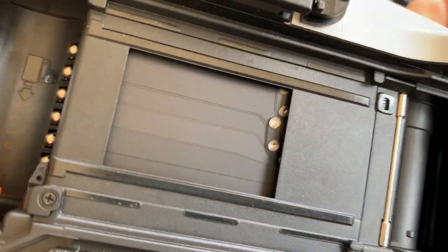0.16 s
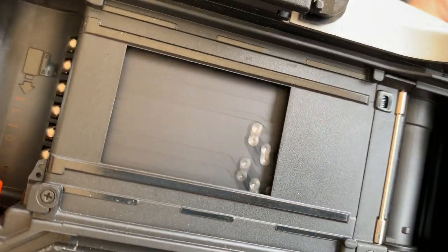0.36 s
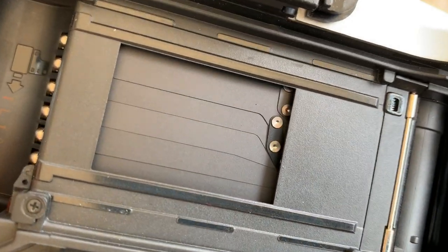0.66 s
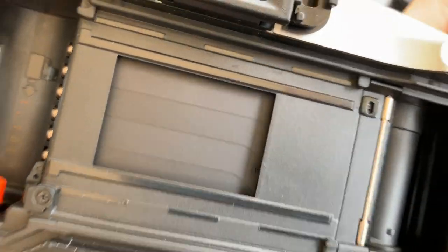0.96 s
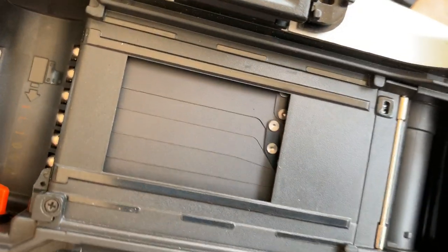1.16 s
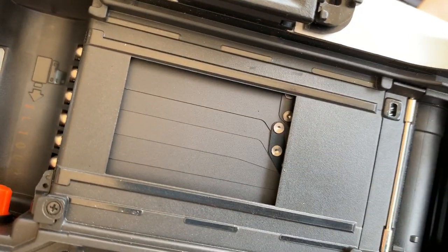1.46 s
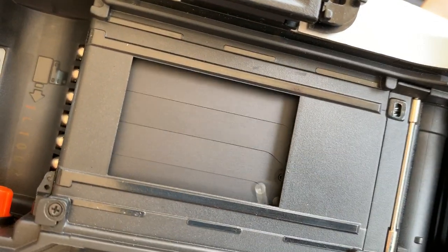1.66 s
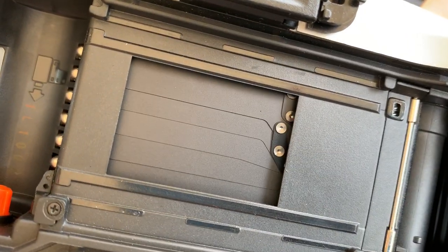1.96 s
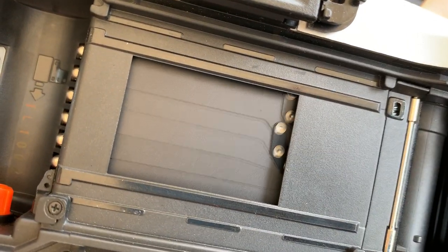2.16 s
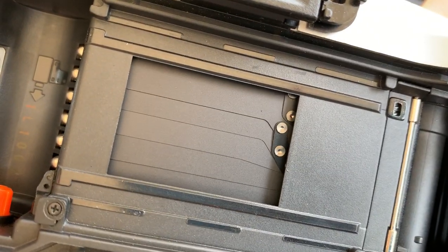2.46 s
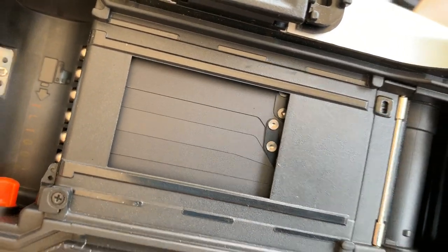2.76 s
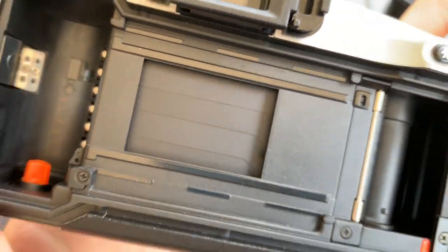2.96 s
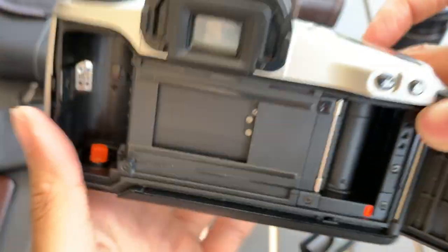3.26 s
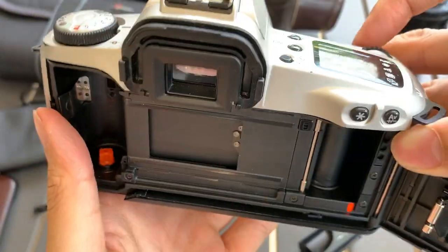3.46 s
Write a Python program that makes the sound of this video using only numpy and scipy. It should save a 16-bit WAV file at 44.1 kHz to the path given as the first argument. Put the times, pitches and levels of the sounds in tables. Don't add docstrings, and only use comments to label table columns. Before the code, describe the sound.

A film camera close to the microphone fires five evenly spaced shots in a quiet room: a crisp double clack, then a short high motor whine ending in small clicks; afterwards a light finger tick and faint creaks.

```python
import sys
import numpy as np
from scipy import signal
from scipy.fft import rfft, irfft, next_fast_len
from scipy.io import wavfile
from scipy.ndimage import uniform_filter1d, map_coordinates

SR = 44100
rng = np.random.default_rng(int(sys.argv[2]) if len(sys.argv) > 2 else 0)


def unload_audio(sound):
    columns = np.transpose(np.atleast_2d(sound))
    steps = np.round(np.clip(columns, -1, 1) * 32767)
    wavfile.write(sys.argv[1], SR, steps.astype(np.int16))


def gain_from_db(level_db):
    decades = np.asarray(level_db, float) / 20
    return 10 ** decades


N = 158760
T = np.arange(N) / SR


def unit(x):
    return x / np.sqrt(np.mean(x ** 2) + 1e-20)


def along(points, hz):
    f, v = np.transpose(points)
    return np.interp(np.log(hz + 1), np.log(f + 1), v)


def wobble(rate):
    coarse = T[::16]
    knots = rng.standard_normal(size=4000)
    return np.interp(T, coarse, map_coordinates(knots, [coarse * rate]))


def filtered(x, response):
    m = next_fast_len(N + 4096, real=True)
    return irfft(rfft(x, m) * response(np.fft.rfftfreq(m, 1 / SR)), m)[:N]


def body(peaks, narrow=.7):
    def response(f):
        total = 0
        for k, (centre, width, db) in enumerate(peaks):
            loss = 1j * f * narrow * width
            total = total + (-1) ** k * gain_from_db(db) * loss / (centre * centre - f * f + loss)
        return total
    return response


def noise(spectrum):
    return unit(filtered(rng.standard_normal(N), lambda hz: gain_from_db(along(spectrum, hz))))


def resonant_noise(centre, width):
    return unit(filtered(rng.standard_normal(N), body([(centre, width, 0)])))


def even_grit(shape, count):
    x = shape * rng.standard_normal((count, len(shape)))
    for _ in range(3):
        z = rfft(x)
        x = irfft(z / (np.abs(z) + 1e-12), len(shape))
        local_power = np.abs(uniform_filter1d(x ** 2, size=24))
        x = x * shape / np.sqrt(local_power + 1e-20)
    return x


def blows(events, back, blow, peaks):
    rise, t60, level_db, crack_db, rattle_db, rattle_t60 = blow
    force, t = np.zeros(N + SR), T[:8192]
    onset = 1 - np.exp(-(t / rise) ** 2)
    hits = [(s + delay, db + less_db) for delay, less_db in [(0, 0)] + back for s, db in events]
    crunch = even_grit((onset * gain_from_db(-60 * t / t60))[:1024], count=len(hits))
    for (s, db), row in zip(hits, crunch):
        force[round(s * SR):][:len(row)] += gain_from_db(db) * row
    for s, db in events:
        rattle = onset * gain_from_db(db + rattle_db - 60 * t / rattle_t60)
        force[round(s * SR):][:len(t)] += rattle * rng.standard_normal(len(t))
    force = force[:N]
    ring = body(peaks, narrow=.9)

    def crack(f):
        return gain_from_db(crack_db) * (1j * f / (1200 + 1j * f)) ** 2 / (1 + 1j * f / 9000)

    scale = np.sqrt(np.mean(np.abs(ring(np.linspace(1, SR / 2, num=2000))) ** 2))
    scattered = force * np.sign(rng.standard_normal(N))
    return gain_from_db(level_db) * (filtered(force, ring) + filtered(scattered, crack)) / scale


def shot_clock():
    starts = np.transpose(MIRROR)[0]
    which = np.clip(np.searchsorted(starts - .1, T) - 1, 0, None)
    return which, T - starts[which]


def each_shot(rows):
    s, db = np.transpose(rows)
    return gain_from_db(np.interp(shot_clock()[1], s, db, -150, -150))


CLICK_RUN_DB = [-2, -1, 0, 2, 2]


def after_mirror(rows):
    return [(s + delay, db + run_db + rng.normal(0, 1.2))
            for (s, _), run_db in zip(MIRROR, CLICK_RUN_DB) for delay, db in rows]


# pitch_hz, level_db (per Hz)
AIR = [(100, -30), (135, -2), (250, 0), (500, -5), (1000, -9), (2500, -17), (8000, -30), (16500, -37)]
# pitch_hz, level_db (per Hz)
RUMBLE = [(8.8, -33), (15, -3), (22, -4), (38, 0), (54, 0), (102, -4), (124, -10), (135, -10), (180, -40),
          (300, -120)]
# pitch_hz, width_hz, level_db
HUM = [(227, 10, -70), (97, 6, -66), (48, 8, -64), (378, 14, -74)]


def room_tone():
    hum = sum(gain_from_db(db) * resonant_noise(centre, width) for centre, width, db in HUM)
    air = gain_from_db(-59.6 + .8 * wobble(3)) * noise(AIR)
    rumble = gain_from_db(-58.5 + 1.2 * wobble(4)) * noise(RUMBLE)
    return air + rumble + hum


# after_mirror_s, level_db
RELEASE = [(-.04, -75), (-.025, -60), (-.012, -52), (-.003, -55), (.005, -80)]
# after_mirror_s, level_db
LOAD = [(-.045, -75), (-.039, -53), (0, -48), (.08, -46), (.13, -50), (.17, -46), (.3, -44), (.33, -48),
        (.37, -63), (.42, -85)]
# after_mirror_s, level_db
GRIT = [(-.046, -40), (-.02, -18), (0, -6), (.05, 0), (.31, -1.5), (.335, -8), (.42, -10)]
# pitch_hz, level_db (per Hz)
GEARS = [(240, -43), (500, -16), (1410, -8), (2290, -3), (3430, -7), (5600, -13), (11500, -18),
         (15300, -30)]
# pitch_hz, width_hz, level_db
HOUSING = (2250, 600, 1.5)
# after_mirror_s, level_db
WHINE = [(.09, -75), (.13, -55), (.143, -51), (.151, -42), (.27, -40), (.31, -43), (.325, -58), (.35, -75)]
# after_mirror_s, level_db
OVERTONES = [(.085, -80), (.11, -65), (.14, -60), (.155, -51), (.18, -53), (.26, -56), (.305, -55),
             (.325, -80)]
ORDERS_DB = [0, -3, -13, -22]
RUN_HZ = [0, -10, 0, 10, 30]
# after_mirror_s, pitch_hz
SAG = [(.2, 0), (.235, 0), (.265, -60), (.305, 0), (.33, -120), (.36, -200)]
RELEASE_S, RELEASE_SPIN_S = -.046, .038
START_S, SPIN_S = .085, .023
FULL_HZ, CREEP_HZ_PER_S, JITTER_HZ = 2445, 120, 28
TEETH, BEAT, FLUTTER_DB = 24, .3, 1.6


def motor():
    which, t = shot_clock()
    releasing = t < .02
    run = np.clip(np.where(releasing, t - RELEASE_S, t - START_S), 0, None)
    spin_up = 1 - np.exp(-run / np.where(releasing, RELEASE_SPIN_S, SPIN_S))
    sag = np.interp(t, *np.transpose(SAG))
    steady_hz = FULL_HZ + np.array(RUN_HZ)[which] + CREEP_HZ_PER_S * run + sag
    hz = steady_hz * spin_up + JITTER_HZ * wobble(400)
    phase = 2 * np.pi * np.cumsum(hz) / SR
    once = np.cos(phase / TEETH + 1.2 * wobble(20))
    twice = np.cos(2 * phase / TEETH + 2 * wobble(30))
    turn = 1 + BEAT * (once + .6 * twice)

    mesh = each_shot(WHINE) * gain_from_db(FLUTTER_DB * wobble(110)) * np.sin(phase)
    over = sum(gain_from_db(db + 1.5 * FLUTTER_DB * wobble(110)) * np.sin((k + 2) * phase)
               for k, db in enumerate(ORDERS_DB))
    whine = mesh + (each_shot(OVERTONES) + each_shot(RELEASE)) * over

    centre, width, db = HOUSING
    boom = gain_from_db(db) * resonant_noise(centre, width)
    grit = each_shot(GRIT) * gain_from_db(1.9 * wobble(500)) * noise(GEARS)
    gears = (grit + boom) / np.sqrt(1 + gain_from_db(2 * db))
    return turn * (np.sqrt(2) * whine + each_shot(LOAD) * gain_from_db(1.5 * wobble(250)) * gears)


# after_mirror_s, peak_db
KICKS = [
    (-.0415, -44),
    (-.031, -45),
    (-.021, -41),
    (.333, -39),
]
# pitch_hz, width_hz, level_db
KICK_BODY = [(1750, 300, -6), (2200, 350, 0)]
# rise_s, t60_s, level_db, crack_db, rattle_db, rattle_t60_s
KICK_BLOW = (.002, .03, -2, -50, -30, .05)


def gear_kicks():
    return blows(after_mirror(KICKS), [], KICK_BLOW, KICK_BODY)


# start_s, peak_db
MIRROR = [(0.15, -12), (0.8186, -11), (1.4866, -10), (2.155, -10), (2.823, -10)]
# delay_s, level_db
MIRROR_BACK = [(-.002, -24), (.007, -19), (.011, -21), (.015, -17)]
# rise_s, t60_s, level_db, crack_db, rattle_db, rattle_t60_s
MIRROR_BLOW = (.0011, .016, 1.2, -22, -24, .12)
# pitch_hz, width_hz, level_db
MIRROR_BODY = [(1680, 200, -5), (2150, 250, 0), (3150, 280, -1.5), (4430, 330, -6), (5450, 200, -12),
               (6010, 250, -10), (7470, 300, -14), (8070, 310, -9), (9920, 440, -10), (11000, 280, -17),
               (13200, 370, -21)]


def mirror():
    return blows(MIRROR, MIRROR_BACK, MIRROR_BLOW, MIRROR_BODY)


# start_s, peak_db
FIRST = [(0.1733, -6), (0.842, -5.5), (1.5095, -4), (2.178, -4), (2.846, -4.5)]
# delay_s, level_db
FIRST_BACK = [(.0015, -5), (.005, -14), (.012, -17), (.016, -23), (.03, -26)]
# rise_s, t60_s, level_db, crack_db, rattle_db, rattle_t60_s
FIRST_BLOW = (.0009, .013, 1.3, -21, -28, .14)
# pitch_hz, width_hz, level_db
FIRST_BODY = [(670, 110, -10), (380, 200, -20), (1150, 200, -12), (1400, 150, -12), (1700, 150, -9),
              (1990, 110, 0), (2250, 200, -1), (3100, 400, -10), (4400, 350, -8), (5430, 300, -12),
              (6210, 200, -15), (7780, 450, -3), (9600, 500, -8), (13100, 900, -20)]


def first_curtain():
    return blows(FIRST, FIRST_BACK, FIRST_BLOW, FIRST_BODY)


# start_s, peak_db
SECOND = [(0.2114, -12), (0.88, -11), (1.548, -11), (2.2166, -10), (2.8845, -12)]
# delay_s, level_db
SECOND_BACK = [(.0025, -1), (.012, -18), (.017, -24)]
# rise_s, t60_s, level_db, crack_db, rattle_db, rattle_t60_s
SECOND_BLOW = (.0017, .018, 1.5, -23, -26, .12)
# pitch_hz, width_hz, level_db
SECOND_BODY = [(300, 150, -20), (650, 150, -8), (1060, 240, -4), (1400, 150, -11), (1750, 180, -7),
               (2290, 300, 0), (3920, 320, -4), (4600, 250, -9), (5150, 250, -8), (7740, 600, -19),
               (9600, 600, -20), (11500, 900, -21), (12700, 500, -21)]


def second_curtain():
    return blows(SECOND, SECOND_BACK, SECOND_BLOW, SECOND_BODY)


# after_mirror_s, peak_db
CAMS = [(.2645, -27), (.273, -28), (.284, -27)]
# rise_s, t60_s, level_db, crack_db, rattle_db, rattle_t60_s
CAM_BLOW = (.001, .016, -2, -16, -25, .05)
# pitch_hz, width_hz, level_db
CAM_BODY = [(1100, 300, -8), (2400, 400, -2), (3210, 400, 0), (4550, 400, -3), (5900, 500, -5),
            (7480, 460, -10), (8710, 500, -11), (10000, 600, -14), (12000, 900, -18)]


def cams():
    return blows(after_mirror(CAMS), [], CAM_BLOW, CAM_BODY)


# after_mirror_s, peak_db
LATCH = [
    (.3135, -25),
    (.323, -39),
]
# rise_s, t60_s, level_db, crack_db, rattle_db, rattle_t60_s
LATCH_BLOW = (.001, .014, -2, -24, -25, .04)
# pitch_hz, width_hz, level_db
LATCH_BODY = [(1700, 300, -5), (2350, 500, 0), (3200, 300, -6), (4500, 450, -3), (5600, 500, -4),
              (7000, 400, -12), (7800, 400, -10), (8800, 500, -10), (10100, 500, -13), (11700, 400, -13),
              (12500, 400, -13)]


def latch():
    return blows(after_mirror(LATCH), [], LATCH_BLOW, LATCH_BODY)


# start_s, length_s, start_pitch_hz, end_pitch_hz, level_db,
# second_partial_db, third_partial_db
BIRD = [
    (.503, .21, 3425, 3390, -59, -19, -45),
    (.562, .05, 2950, 2720, -66, -15, -30),
    (.605, .055, 2645, 2610, -66, -14, -10),
    (.64, .16, 2500, 2430, -60, -22, -30),
    (.562, .09, 3200, 3050, -72, -30, -40),
    (3.275, .04, 840, 830, -61, -30, -22),
]


def bird():
    out = np.zeros(N)
    for s, length, hz0, hz1, level_db, second_db, third_db in BIRD:
        u = np.clip((T - s) / length, 0, 1)
        hz = hz0 + (hz1 - hz0) * u + 25 * wobble(300)
        phase = 2 * np.pi * np.cumsum(hz) / SR
        attack, release = np.clip(u * 24, 0, 1), np.clip((1 - u) * 15, 0, 1)
        shape = attack * gain_from_db(-9 * u + 2.5 * wobble(90)) * release
        tone = np.sin(phase) + gain_from_db(second_db) * np.sin(2 * phase) + gain_from_db(third_db) * np.sin(3 * phase)
        out += gain_from_db(level_db) * shape * tone
    return np.sqrt(2) * out


# start_s, peak_db
TICKS = [
    (.7115, -47),
    (3.2235, -34),
    (3.236, -52),
]
# rise_s, t60_s, level_db, crack_db, rattle_db, rattle_t60_s
FINGER_BLOW = (.0008, .014, -2, -22, -22, .06)
# pitch_hz, width_hz, level_db
FINGER_BODY = [(1350, 250, -6), (2200, 500, 1.5), (4550, 500, 0), (6000, 700, -14), (8000, 900, -15)]


def finger_ticks():
    return blows(TICKS, [], FINGER_BLOW, FINGER_BODY)


# start_s, peak_db
CREAKS = [(3.29, -58), (3.311, -51), (3.33, -58), (3.35, -58), (3.375, -59), (3.446, -52), (3.49, -58),
          (3.53, -57)]
# rise_s, t60_s, level_db, crack_db, rattle_db, rattle_t60_s
GRIP_BLOW = (.002, .03, -2, -24, -14, .1)
# pitch_hz, width_hz, level_db
GRIP_BODY = [(1100, 300, -5), (2100, 300, -2), (2600, 300, -3), (3050, 350, 0)]


def grip_creaks():
    return blows(CREAKS, [], GRIP_BLOW, GRIP_BODY)


# pitch_hz, t60_s
ROOM = [(200, .25), (2000, .2), (10000, .1)]


def room(x):
    hz, t, z = signal.stft(rng.standard_normal(SR // 2), SR, nperseg=256)
    decay = gain_from_db(-60 * t / along(ROOM, hz)[:, None])
    tail = signal.istft(z * decay, SR, nperseg=256)[1]
    late = np.pad(x, (250, 0))
    return signal.fftconvolve(late, tail / np.linalg.norm(tail))[:N]


def scene():
    shutter = mirror() + first_curtain() + second_curtain()
    camera = motor() + gear_kicks() + shutter + cams() + latch() + finger_ticks() + grip_creaks()
    return (camera + gain_from_db(-20) * room(camera) + bird() + room_tone())[None]


def top_cut(x):
    return signal.sosfilt(signal.butter(12, 16980, fs=SR, output="sos"), x)


def record(dry):
    mix = filtered(dry[0], lambda hz: 1 / (1 + (hz / 15900) ** 80))[None]
    return top_cut(mix)


dry = scene()
out = record(dry)
unload_audio(out)
```